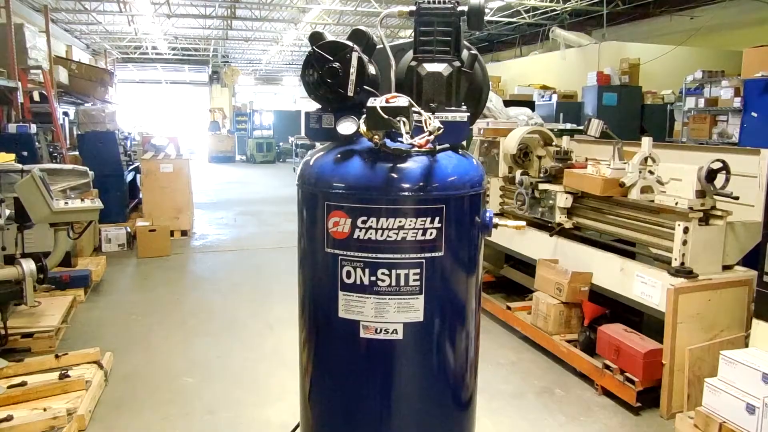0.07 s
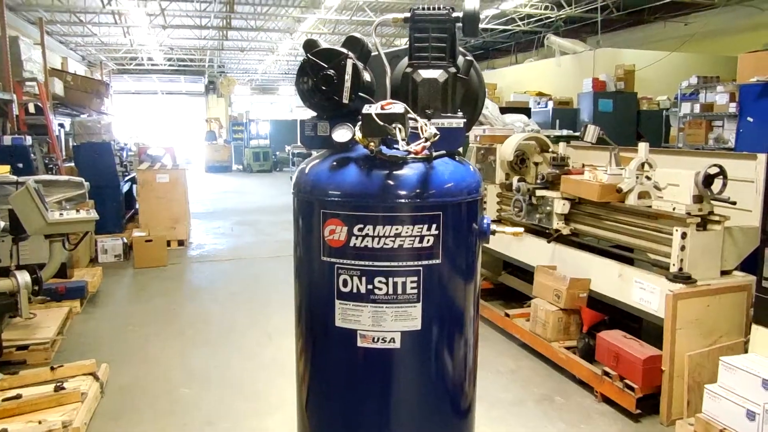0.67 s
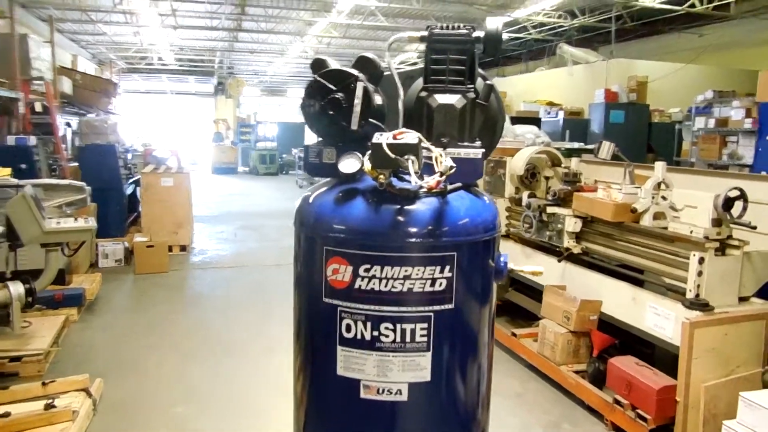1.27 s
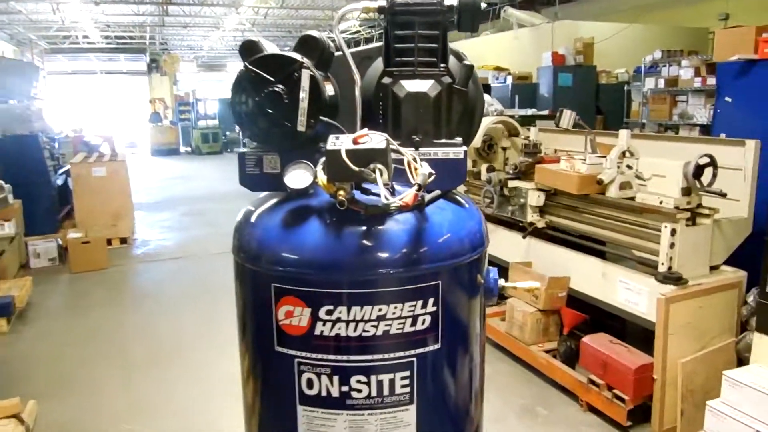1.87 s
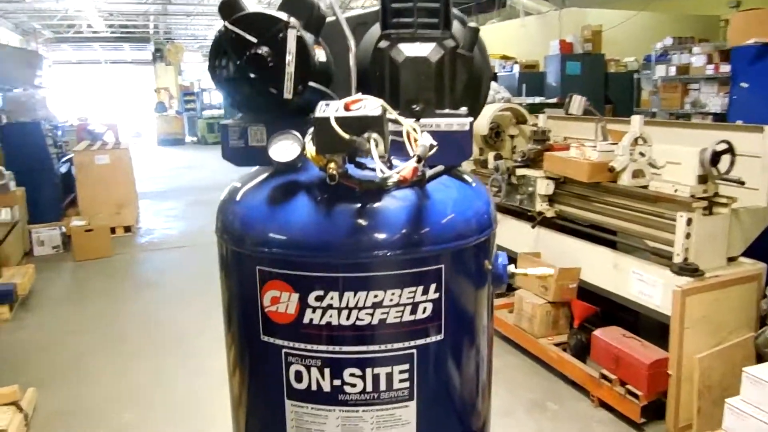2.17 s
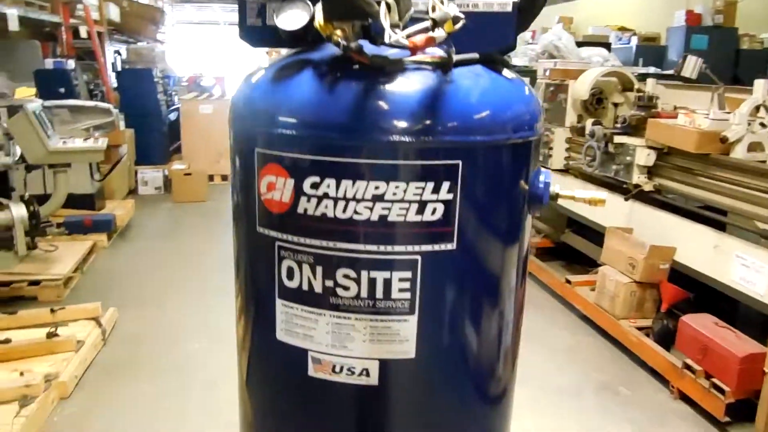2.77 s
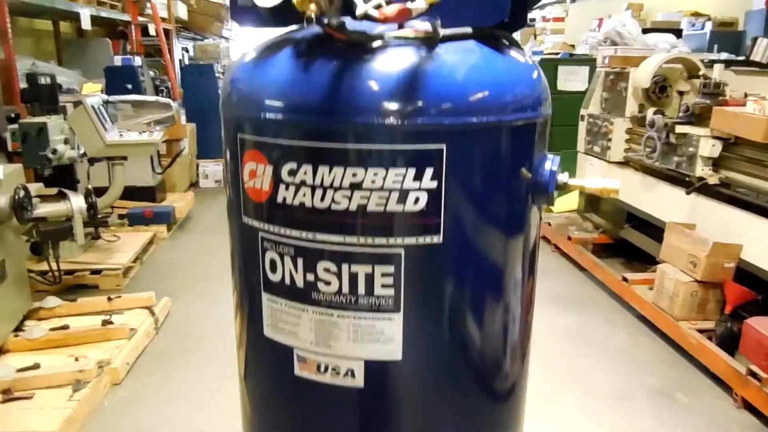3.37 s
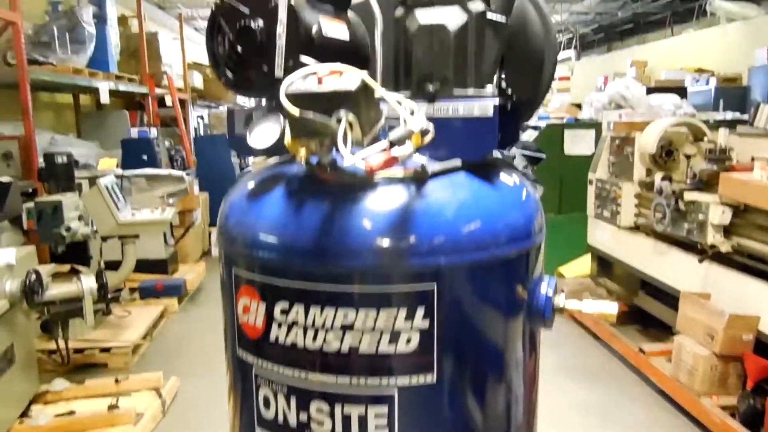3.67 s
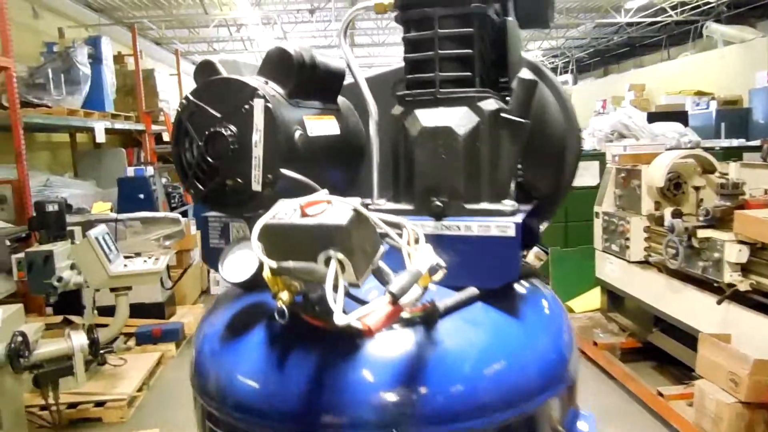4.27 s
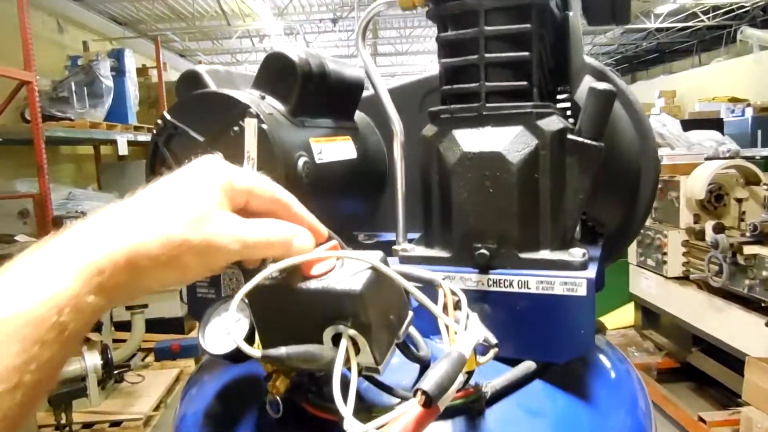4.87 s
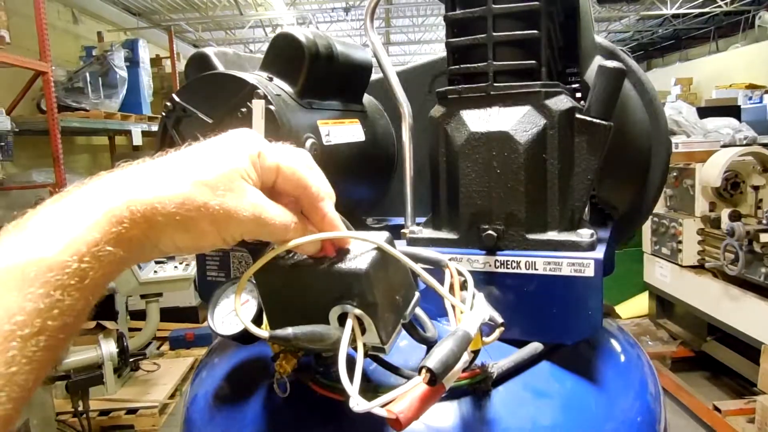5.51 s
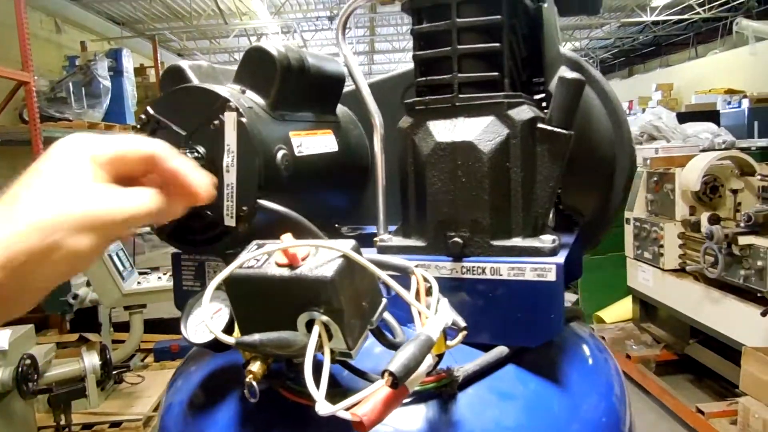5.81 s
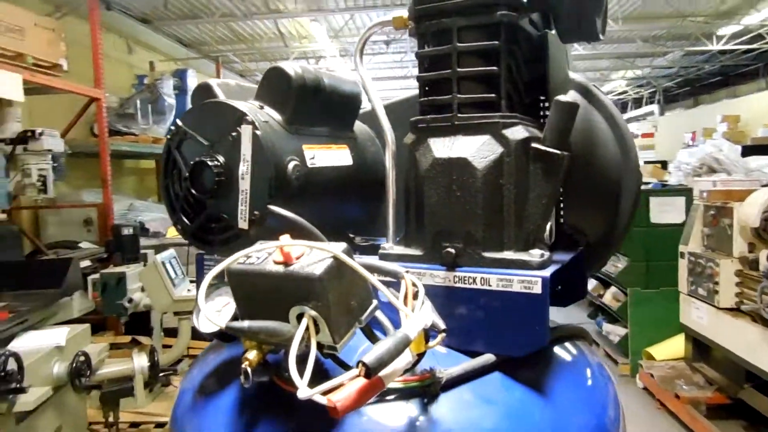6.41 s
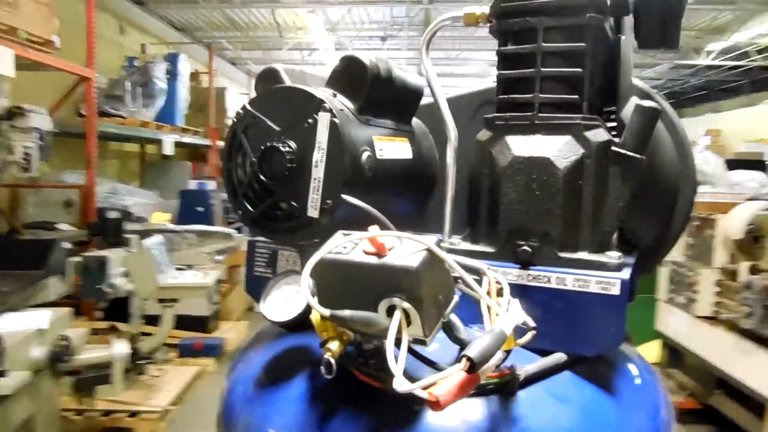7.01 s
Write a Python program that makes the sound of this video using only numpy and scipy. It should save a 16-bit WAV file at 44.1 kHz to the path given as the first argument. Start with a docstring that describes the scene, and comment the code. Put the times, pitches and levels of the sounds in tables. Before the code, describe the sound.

A large workshop hums quietly with ventilation and a low electrical drone. Shoes scuff faintly on concrete and there is a small, dry tick. After about five seconds a switch snaps sharply, close to the microphone. An air compressor's motor growls, its belt gives a brief chirp, and the pump quickly comes up to a loud, steady run of rapid knocking, hissing air and metallic ringing.

```python
"""A belt-driven twin-cylinder air compressor starts in a large workshop, heard close, in stereo.
Ventilation, mains hum and a low drone fill the hall; from 0.8 s shoes scuff, with three ticks at 1.3 s.
At 5.3 s the pressure switch snaps, then the motor growls on inrush current and the slipping belt chirps.
The pump comes up to 16.5 turns/s: it knocks and rings its tank, intake reeds flutter on each stroke,
delivery valves spit air, and fan, pulley and housings sing."""
import sys
import numpy as np
from scipy import signal
from scipy.fft import rfft, irfft
from scipy.io import wavfile
from scipy.ndimage import uniform_filter1d

SR = 44100
rng = np.random.default_rng(int(sys.argv[2]) if len(sys.argv) > 2 else 0)


def wrap_up_sound(samples):
    """Save the sound to the file named by the first command line argument, as 16-bit audio."""
    columns = np.atleast_2d(samples).T
    # keep every value between -1 and 1, then stretch to whole-number steps
    tamed = np.clip(columns, -1, 1)
    steps = np.round(tamed * 32767).astype(np.int16)
    wavfile.write(sys.argv[1], SR, steps)


N = 310905
T = np.arange(N) / SR
FREQ_HZ = np.maximum(np.arange(N // 2 + 1) * SR / N, 1)
TOP_HZ = 15700

# ventilation spectrum (frequency [Hz], gain [dB])
VENT_EQ = [(20, -2), (45, 0.5), (80, -2.5), (125, 1), (200, -2.5), (270, -0.5), (450, -1.5), (650, -3),
           (900, -1.5), (1500, -6), (1900, -9.5), (4000, -13.5), (9000, -16), (15000, -28)]
# mains hum (frequency [Hz], level [dB])
HUM_TONES = [(120, -45), (121.7, -57.5)]
# distant drone envelope (time [s], relative level [dB])
DRONE_LEVELS = [(0.2, -52), (0.85, -46.5), (1.04, -72), (1.09, -54), (2.4, -57), (2.61, -46), (3.89, -47),
                (5.21, -55.5), (5.3, -54)]
# drone resonances (frequency [Hz], width [Hz], gain [dB])
DRONE_MODES = [(251.6, 14, -0.5), (373, 12, -6.5)]
# shoe scuffs (time [s], length [s], decay [s], relative level [dB])
SCUFFS = [(0.76, 0.049, 0.059, -46), (2.178, 0.15, 0.21, -36), (3.15, 0.032, 0.2, -42.5),
          (3.513, 0.086, 0.17, -37), (4.874, 0.063, 0.07, -38)]
# sole on concrete (frequency [Hz], gain [dB])
SCUFF_EQ = [(1000, -6.5), (3000, -5), (5200, -4.5), (6800, 5.5), (8500, 5), (10500, -6), (14000, -42)]
# nearby ticks (time [s], level [dB])
TICKS = [(1.268, -32), (1.274, -30), (1.2815, -20.5)]
# tick spectrum (frequency [Hz], gain [dB])
TICK_EQ = [(1500, -25), (3000, -9), (5000, -12), (8000, 1), (10500, 3), (13000, -6), (15500, -18)]
# switch lever, contacts, rebound (time [s], level [dB], relative ring [dB], cutoff [Hz])
SWITCH_BLOWS = [(5.3347, -24.5, -3, 4550), (5.3783, -9.5, -12, 15000), (5.3813, -16.5, 5.5, 8960)]
# switch crack (frequency [Hz], gain [dB])
CRACK_EQ = [(300, -24), (700, -18), (1300, -5.5), (2800, 1.5), (4200, -2), (5500, -5), (7500, -1.5),
            (10500, -2.5), (12500, -20), (15500, -18)]
# switch box resonances (frequency [Hz], t60 [s], gain [dB])
BOX_MODES = [(743, 0.076, -4.5), (770, 0.055, -9), (924, .09, -21), (1760, 0.035, -10), (3180, 0.06, -16),
             (3580, .11, -20), (7100, 0.05, -14), (8000, 0.07, -19)]
# motor growl (frequency [Hz], gain [dB])
GROWL_EQ = [(60, 7), (120, -3), (200, -23), (360, 11.5), (600, -0.5), (850, -7), (1300, -15), (1900, -11),
            (2400, -22), (3000, -27), (8000, -43)]
# crank run-up (time [s], speed [turns/s])
CRANK_SPEEDS = [(5.43, 0), (5.55, 9.5), (5.72, 13.6), (5.8, 16.5), (6.4, 16.535), (7.05, 16.5)]
# pump resonances (frequency [Hz], width [Hz], gain [dB])
KNOCK_MODES = [(577, 26, -1), (680, 36, -5), (843, 26, -.5), (931, 22, -1)]
# pump casing (frequency [Hz], gain [dB])
CASING_EQ = [(60, -15), (200, 3.5), (400, 6.5), (700, 2), (1100, 0.5), (1500, -4), (2200, -22)]
# belt slips (peak time [s], attack [s], decay [s], level [dB])
BELT_SLIPS = [(5.508, 0.0073, 0.026, -13.5), (5.585, 0.0093, 0.012, -14)]
# belt rasp (frequency [Hz], gain [dB])
RASP_EQ = [(1000, -2.5), (3000, -1.5), (5200, -4), (7500, 2.5), (10000, 8.5), (12000, -6), (15500, -14)]
# tank resonances (frequency [Hz], width [Hz], gain [dB])
TANK_MODES = [(1076, 26, 0), (1152, 50, -8), (1188, 20, -10), (1215, 14, -9), (1328, 30, -8),
              (1663, 14, -17), (1768, 22, -17)]
# suction strokes (start [turns], length [turns], flutter [Hz], gain under load [dB])
STROKES = [(0, .46, 311, 0), (.49, .45, 315.5, -5.5)]
# intake filter housing (frequency [Hz], width [Hz], gain [dB])
INTAKE_MODES = [(311, 120, 0.5)]
# suction thump (frequency [Hz], gain [dB])
THUMP_EQ = [(15, 1.5), (33, -6), (66, -6.5), (100, -1.5), (135, -1.5), (165, 2.5), (200, -5), (235, 3.5),
            (300, 5), (600, -42), (3000, -67)]
# air hiss (frequency [Hz], gain [dB])
AIR_EQ = [(500, -27), (1300, -16), (1700, 1), (2100, -6), (2600, 0.5), (4000, -1), (5200, -4), (7500, 2.5),
          (9500, 2), (11500, -7), (15500, -20)]
# cooling fins and copper pipe (frequency [Hz], width [Hz], gain [dB])
FIN_MODES = [(2450, 120, 8), (2770, 23, -1), (3230, 17, -5), (3680, 40, 5), (4050, 90, 6), (7700, 58, -1),
             (8060, 47, -1), (9250, 150, 4), (9950, 400, 4)]
# fan, pulley and housing tones (frequency [Hz], relative level [dB])
WHINE_TONES = [(576.0, -32), (678.3, -34), (845.2, -32.5), (931.3, -31), (1077, -24.5), (1217, -32.5),
               (1330, -33.5), (1663, -37), (1771, -37)]
# microphone port response (frequency [Hz], left gain [dB], right gain [dB])
PORT_EQ = [(1500, 2.5, 3), (4370, 3, 4), (6000, 1, 4), (6920, 0.5, 6.5), (7660, 4.5, 11.5), (8660, 0.5, 4),
           (9300, 7.5, -2.5), (10100, 7.5, 2), (11100, 6, 1.5), (15300, 7.5, 3.5)]


def undb(db):
    """Decibels to gain."""
    return np.exp(np.asarray(db) * (np.log(10) / 20))


def unit(x):
    """Scale to rms 1."""
    return x / np.sqrt(np.mean(x ** 2))


def curve(table):
    """A (time, value) table at every sample."""
    return np.interp(T, *np.transpose(table))


def ramp(start_s, rise_s):
    """Linear rise from 0 to 1."""
    return np.clip((T - start_s) / rise_s, 0, 1)


def fade(start_s, t60_s):
    """Sudden start, exponential decay."""
    return (T >= start_s) * np.exp(-np.log(1000) * np.clip((T - start_s) / t60_s, 0, 10))


def swell(peak_s, attack_s, decay_s):
    """Exponential rise and fall."""
    return np.exp(-np.minimum(np.maximum((peak_s - T) / attack_s, (T - peak_s) / decay_s), 20))


def walk(rate_hz):
    """Smooth random drift, rms 1."""
    hold = int(SR / rate_hz)
    steps = np.repeat(rng.standard_normal(N // hold + 1), hold)
    return unit(uniform_filter1d(uniform_filter1d(steps, hold), hold)[:N])


def colour(x, eq):
    """Filter by a (frequency, gain) table."""
    hz, db = np.transpose(eq)
    return irfft(rfft(x) * undb(np.interp(np.log(FREQ_HZ), np.log(hz), db)), N)


def resonate(x, modes):
    """Parallel resonators of alternating sign."""
    response = sum((-1) ** k * undb(db) / (1 + 1j * (FREQ_HZ ** 2 - hz ** 2) / (FREQ_HZ * width_hz))
                   for k, (hz, width_hz, db) in enumerate(modes))
    return irfft(rfft(x) * response, N)


def diffuse(pair, apart_hz=4600, bass_side=0.032, treble_side=0.8):
    """Two unrelated signals at two close ports: alike in the bass, loosely related in the treble."""
    share = bass_side + treble_side / np.sqrt(1 + (apart_hz / FREQ_HZ) ** 4)
    mid, side = rfft(pair)
    return irfft(np.array([mid + share * side, mid - share * side]) / np.sqrt(1 + share ** 2), N)


def noise(eq):
    """Coloured stereo noise, rms 1."""
    return unit(colour(diffuse(rng.standard_normal((2, N))), eq))


def hall(vent_db=-38, drone_trim_db=-1, right_lag_s=83e-6):
    """Wavering hum, low drone and ventilation rush arrive from the open hall on the left."""
    hum = 0
    for hz, db in HUM_TONES:
        amplitude = np.sqrt(2) * undb(db + 1.5 * walk(2.84))
        hum += amplitude * np.sin(2 * np.pi * hz * T + 1.23 * walk(3.4))
    drone = unit(resonate(rng.standard_normal(N), DRONE_MODES))
    drone *= undb(curve(DRONE_LEVELS) + drone_trim_db)
    vent = noise(VENT_EQ) * undb(vent_db + 0.19 * walk(4.4))
    left, right = hum + drone + vent
    delay = np.exp(-2j * np.pi * FREQ_HZ * right_lag_s)
    return np.array([left, irfft(rfft(right) * delay, N)])


def scuffs(rise_s=0.027, trim_db=-3):
    """Soles slide on concrete."""
    slide = sum(undb(db) * ramp(start_s, rise_s) * np.exp(-np.maximum(T - start_s - length_s, 0) / decay_s)
                for start_s, length_s, decay_s, db in SCUFFS)
    return noise(SCUFF_EQ) * slide * undb(walk(60) + trim_db)


def ticks(t60_s=0.006, tail_t60_s=0.074, tail_db=-24):
    """Small dry ticks with faint tails."""
    envelope = sum(undb(db) * (fade(start_s, t60_s) + undb(tail_db) * fade(start_s, tail_t60_s))
                   for start_s, db in TICKS)
    return noise(TICK_EQ) * envelope


def switch(crack_t60_s=0.025):
    """Each blow cracks and rings the switch box; softer blows are duller."""
    crack, snap = noise(CRACK_EQ), 0
    box = sum(undb(db) * fade(0, t60_s) * np.sin(2 * np.pi * hz * T) for hz, t60_s, db in BOX_MODES)
    for start_s, db, ring_db, cutoff_hz in SWITCH_BLOWS:
        ring = undb(ring_db) * np.interp(T - start_s, T, box)
        lowpass = signal.butter(2, cutoff_hz, fs=SR, output="sos")
        snap += undb(db) * signal.sosfilt(lowpass, crack * fade(start_s, crack_t60_s) + ring)
    return snap


def echo(x, delay_s=0.0096, near_t60_s=0.45, near_db=-11, hall_t60_s=0.65, hall_db=-14):
    """Quick reflections off tank and machines, plus the longer hall tail."""
    response = 0
    for t60_s, db in ((near_t60_s, near_db), (hall_t60_s, hall_db)):
        tail = diffuse(rng.standard_normal((2, N))) * fade(delay_s, t60_s)
        response += undb(db) * tail / np.sqrt(np.sum(tail ** 2) / 2)
    return signal.oaconvolve(x, response[:, :SR], axes=1)[:, :N]


def motor(start_s=5.427, buzz_hz=120, rough_db=1, inrush_db=-23.5, running_db=-32, settle_s=0.22):
    """Inrush current shakes the motor at twice the mains frequency, then dies down."""
    pulses = np.diff(np.floor(T * buzz_hz), prepend=0)
    burst = rng.standard_normal(N) * fade(0, t60_s=0.02)
    buzz = unit(colour(signal.fftconvolve(pulses - pulses.mean(), burst)[:N], GROWL_EQ))
    growl = unit(buzz + undb(rough_db) * noise(GROWL_EQ))
    level_db = running_db + (inrush_db - running_db) * np.exp(-np.maximum(T - start_s, 0) / settle_s)
    return growl * ramp(start_s, rise_s=0.0089) * undb(level_db)


def crank(stroke_s=5.8195):
    """Crank angle in turns; whole numbers begin the stronger suction stroke."""
    turns = np.cumsum(curve(CRANK_SPEEDS)) / SR
    return turns - np.interp(stroke_s, T, turns)


def clatter(turns, repeat, grain_db):
    """Dense small impacts; the share `repeat` recurs at the same crank angle every turn."""
    def impacts(size):
        return unit(rng.standard_normal((2, size)) * undb(grain_db * rng.exponential(size=size)))

    slots = int(SR / CRANK_SPEEDS[-1][1])
    locked = impacts(slots)[:, (turns % 1 * slots).astype(int) % slots]
    return diffuse(np.sqrt(repeat) * locked + np.sqrt(1 - repeat) * impacts(N))


def build_up(start_s, rise_s, climb_db_per_s):
    """Gain that ramps in, then climbs as the tank fills."""
    return ramp(start_s, rise_s) * undb(climb_db_per_s * np.maximum(T - start_s, 0))


def knocks(turns, knock_db=-24.5, casing_db=-25, swing_db=1.5, peak_turns=0.76):
    """Pump and casing clatter under a load that swings once a turn; the level dips briefly at speed."""
    lull_db, lull_s, lull_width_s = -5, 6.02, 0.086
    lull = np.exp(-((T - lull_s) / lull_width_s) ** 2)
    load = undb(swing_db * np.cos(2 * np.pi * (turns - peak_turns)) + lull_db * lull)
    knock = unit(resonate(clatter(turns, repeat=0.36, grain_db=1.5) * load, KNOCK_MODES))
    casing = unit(colour(clatter(turns, repeat=0.54, grain_db=2.5) * load, CASING_EQ))
    body = undb(knock_db) * knock + undb(casing_db) * casing
    return body * build_up(start_s=5.46, rise_s=0.17, climb_db_per_s=1.7)


def belt(peak_s=5.566, peak_hz=2182, octaves_per_s=13.5, max_hz=4200, chirp_db=-16, scatter=0.07, count=6):
    """Many belt patches slip at once: a rasp and a rough rising chirp until the flywheel catches up."""
    hz = np.minimum(peak_hz * 2 ** (octaves_per_s * (T - peak_s)), max_hz)
    patches = [np.sin(2 * np.pi * np.cumsum(hz * (1 + scatter * walk(600))) / SR) for _ in range(count)]
    squeal = diffuse(np.array([sum(patches[::2]), sum(patches[1::2])])) * 2 / np.sqrt(count)
    chirp = squeal * undb(chirp_db) * swell(peak_s, attack_s=0.025, decay_s=0.052)
    slips = sum(undb(db) * swell(at_s, attack_s, decay_s) for at_s, attack_s, decay_s, db in BELT_SLIPS)
    return chirp + noise(RASP_EQ) * slips


def compression(turns, swing_db=4, peak_turns=0.11):
    """Gain that peaks as each of the two cylinders delivers."""
    return undb(swing_db * np.cos(2 * np.pi * 2 * (turns - peak_turns)))


def tank(turns, base_db=-27):
    """Each delivery rings the tank, louder as pressure builds."""
    ring = unit(resonate(clatter(turns, repeat=0.17, grain_db=2) * compression(turns), TANK_MODES))
    return ring * undb(base_db) * build_up(start_s=5.52, rise_s=0.14, climb_db_per_s=4.5)


def intake(turns, gain_db=-11, thump_db=-21, uneven_db=1.23, edge_turns=0.03, wobble_rad=0.35):
    """Each suction stroke thumps, then its reed valve flutters into the filter housing."""
    load = ramp(start_s=5.59, rise_s=0.05)  # the cylinders grow unequal against pressure
    flutter, pulses = 0, 0
    for start_turns, length_turns, hz, db in STROKES:
        angle = (turns - start_turns + edge_turns) % 1 - edge_turns
        age_s = T - np.interp(turns - angle, turns, T)
        inside_turns = np.minimum(angle + edge_turns, length_turns - angle)
        gate = np.sin(np.pi / 2 * np.clip(inside_turns / edge_turns, 0, 1)) ** 2
        flutter += undb(db * load) * gate * np.cos(2 * np.pi * hz * age_s + wobble_rad * walk(40))
        stroke_count = np.floor(turns - start_turns)
        pulses += np.diff(stroke_count, prepend=stroke_count[0])
    thumps = undb(thump_db) * unit(colour(pulses, THUMP_EQ))
    strokes = (resonate(flutter, INTAKE_MODES) + thumps) * undb(gain_db + uneven_db * walk(25))
    return strokes * build_up(start_s=5.538, rise_s=0.017, climb_db_per_s=0.2)


def hiss(turns, base_db=-16.5, fins_db=-12, spit_db=2.8, lead_turns=0.048, width_turns=0.016):
    """Air hisses, fins and pipe ring; each delivery valve spits as it shuts just ahead of suction."""
    air = unit(colour(clatter(turns, repeat=0.071, grain_db=0.5), AIR_EQ))
    fins = undb(fins_db) * unit(resonate(clatter(turns, repeat=0.15, grain_db=-1.5), FIN_MODES))
    spit = np.exp(-(np.sin(2 * np.pi * (turns + lead_turns)) / (2 * np.pi * width_turns)) ** 2)
    level_db = base_db + spit_db * spit * (1 + 0.5 * walk(33)) + 1.23 * walk(170)
    return (air + fins) * undb(level_db) * ramp(start_s=5.55, rise_s=0.041)


def whine(turns, trim_db=-5, waver_db=2, wander_rad=0.4, throb_power=0.64):
    """Fan, pulley and housings sing at speed; the tones waver and throb with the load."""
    tones = sum(undb(db + waver_db * walk(9)) * np.sin(2 * np.pi * hz * T + wander_rad * walk(30))
                for hz, db in WHINE_TONES)
    throb = unit(compression(turns) ** throb_power)
    return np.sqrt(2) * undb(trim_db) * tones * throb * ramp(start_s=5.55, rise_s=0.23)


def scene(switch_send_db=-2):
    """Compressor and shoes in the humming hall; only switch, motor and belt feed the echo."""
    snap, drive, turns = switch(), motor() + belt(), crank()
    reflections = echo(undb(switch_send_db) * snap + drive)
    pump = knocks(turns) + tank(turns) + hiss(turns) + intake(turns) + whine(turns)
    return snap + drive + reflections + pump + scuffs() + ticks() + hall()


def record(dry):
    """Each microphone port colours the treble; the input fades in, clips and is low-passed."""
    hz, *sides_db = np.transpose(PORT_EQ)
    heard = np.array([colour(x, np.transpose([hz, db])) for x, db in zip(dry, sides_db)])
    clipped = np.clip(heard * ramp(start_s=0.108, rise_s=0.008), -1, 1)
    lowpass = signal.ellip(8, 0.2, 70, TOP_HZ, fs=SR, output="sos")
    return signal.sosfilt(lowpass, clipped)


dry = scene()
out = record(dry)
wrap_up_sound(out)
```